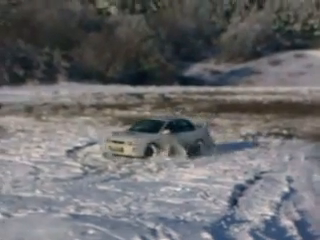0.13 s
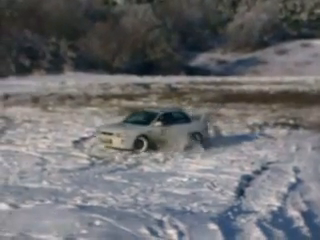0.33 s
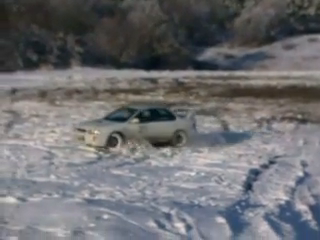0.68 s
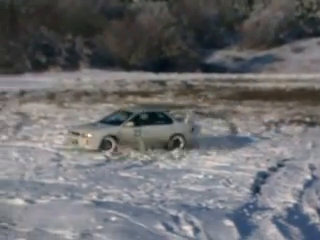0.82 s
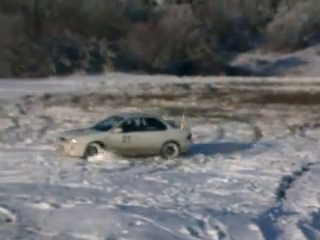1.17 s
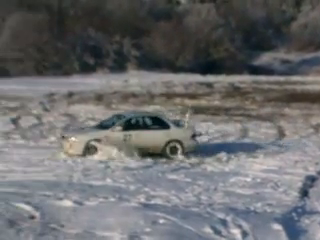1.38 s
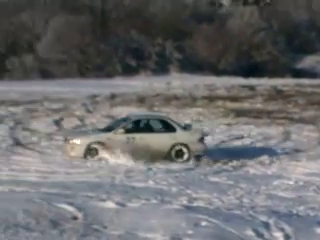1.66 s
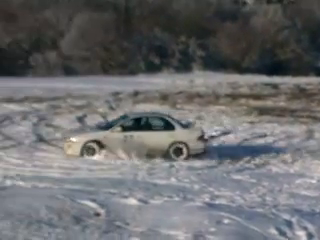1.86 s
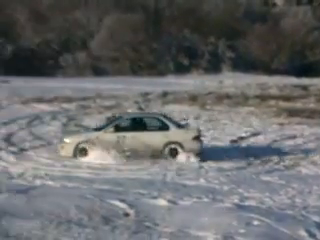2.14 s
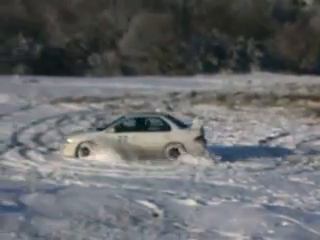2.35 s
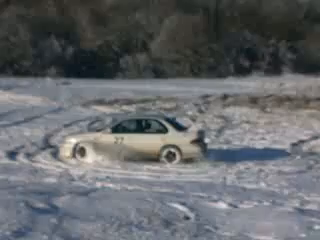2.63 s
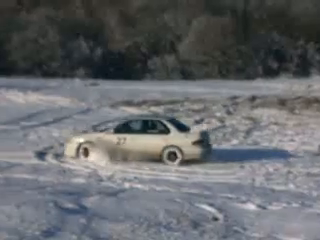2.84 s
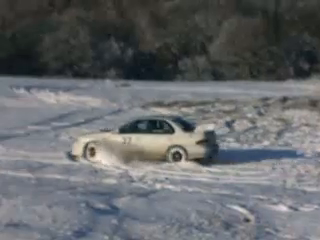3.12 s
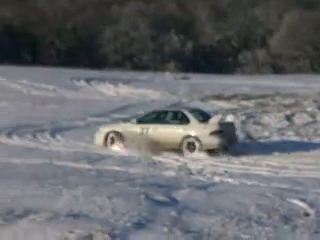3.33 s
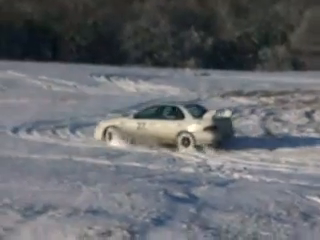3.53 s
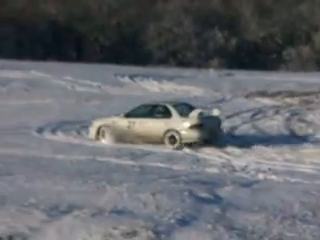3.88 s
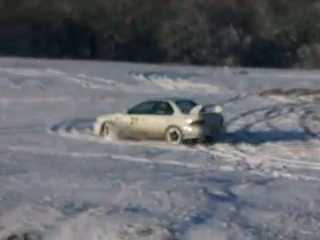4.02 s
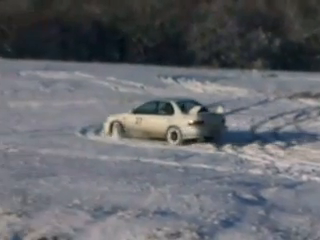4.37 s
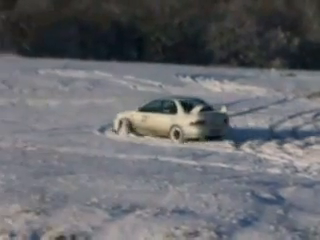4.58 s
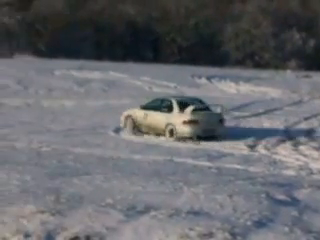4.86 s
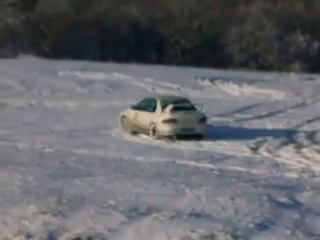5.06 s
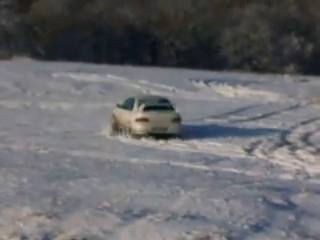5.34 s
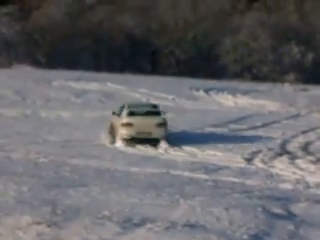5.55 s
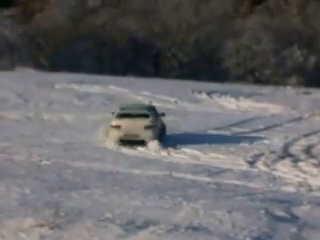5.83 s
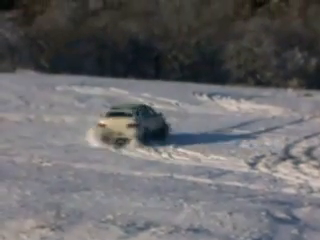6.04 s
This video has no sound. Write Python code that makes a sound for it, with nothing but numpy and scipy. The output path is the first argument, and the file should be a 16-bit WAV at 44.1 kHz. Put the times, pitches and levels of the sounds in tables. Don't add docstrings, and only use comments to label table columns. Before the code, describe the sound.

A turbocharged car engine burbles and revs while sliding on snow outdoors, with tyre spray, tailpipe pops and faint camera hiss.

```python
import sys
import numpy as np
from scipy import signal
from scipy.fft import rfft, irfft, next_fast_len
from scipy.io import wavfile
from scipy.ndimage import uniform_filter1d, minimum_filter1d, map_coordinates

SR = 44100
rng = np.random.default_rng(int(sys.argv[2]) if len(sys.argv) > 2 else 0)


def boost(x):
    u = np.asarray(x, float) / 20
    return 10 ** u


def wav_record(signal):
    frames = np.transpose(np.atleast_2d(signal))
    bounded = np.clip(frames, -1, 1)
    quanta = np.round(bounded * 32767).astype(np.int16)
    wavfile.write(sys.argv[1], SR, quanta)


N = 273375
T = np.arange(N) / SR

# time_s, firing_rate_hz
ENGINE_SPEED = [(0.0, 90.87), (0.29, 116.59), (0.528, 106.78), (0.835, 77.92), (1.07, 65.43),
                (1.503, 59.84), (2.007, 75.63), (2.584, 52.15), (3.017, 69.04), (3.646, 53.86),
                (3.811, 53.94), (4.384, 37.93), (4.42, 45.85), (4.69, 51.47), (5.145, 72.08),
                (5.226, 72.27), (5.819, 95.43), (6.2, 98.95)]
# time_s, exhaust_pressure_db, pulse_sharpness_db
ENGINE_LOAD = [(0, -38, 6), (.2, -40, 11.5), (.4, -42.5, 12), (.72, -31.5, -11), (1.0, -43.5, -3),
               (1.45, -39, 0), (1.7, -38.5, -2), (2.0, -35.5, -0.5), (2.5, -42.5, -11.5), (2.7, -42, -1.5),
               (3.0, -35.5, -5), (3.2, -38.5, -4), (3.9, -41.5, -5), (4.2, -53, 1.5), (4.5, -47.5, -1),
               (5.1, -37, -8), (5.85, -39, -1.5), (6.2, -41.5, -0.5)]
# open_s, shut_s, wheelspin_spray_db, spray_crack_share (0-1, spray band cracking with each firing)
THROTTLE_BLIPS = [
    (-.3, .32, 3, 0),
    (1.54, 1.86, 1.5, 0.02),
    (2.604, 2.978, 3, 0.58),
    (4.418, 4.982, 7.5, 0.6),
    (4.912, 6.003, 5, .3),
]
# time_s, share (0-1)
NOSE_FACING = [(0, 1), (.55, 1), (.95, 0), (6.2, 0)]
# time_s, share (0-1)
TAIL_FACING = [(0, 0), (4.55, 0), (5.45, 1), (6.2, 1)]
# freq_hz, level_db
SILENCER = [(80, 13.5), (100, 9), (120, 5.5), (140, 1), (155, -12.5), (175, -17.5), (200, -20),
            (240, -15.5), (300, -23.5), (400, -32), (600, -80)]
# freq_hz, level_db
BANK_BURBLE = [(35, -55), (55, -20), (75, -8.5), (95, 2.5), (115, 3.5), (135, 3.5), (150, -1.5),
               (170, -9.5), (200, -21), (240, -21), (300, -37), (400, -33.5), (600, -78)]
# freq_hz, level_db
FRONT_COLOUR = [(60, -24), (85, -10), (115, -14.5), (150, 14), (200, 7.5), (240, -2), (300, -7), (900, 12)]
# pitch_hz, width_hz, level_db
OUTLET_MODES = [(314, 78, 0), (610, 88, 4.5), (1210, 130, -7.5), (1750, 81, -10.5)]
# freq_hz, level_db
RASP_COLOUR = [(200, 12), (330, 6.5), (420, -12), (520, 7), (650, 8.5), (800, 7.5), (1000, -14.5),
               (1300, -4.5), (1600, -32)]
# freq_hz, level_db
SPRAY_COLOUR = [(700, 5.5), (1200, -1), (1600, 1.5), (1950, 2), (2150, -2), (2380, 1.5), (2550, -9),
                (2780, -2), (3000, -19), (3300, -9.5), (3600, -21), (3750, -24), (7000, -19.5)]
# start_s, peak_db, ring_hz, thud_db, knock_db
TAILPIPE_POPS = [(0.016, -29, 985, -2, -21), (0.527, -26, 1090, -6, -16.5),
                 (3.763, -12, 1105, -10.5, -15.5), (4.165, -15.5, 943, -21, -13),
                 (4.922, -18.5, 856, -17, -14.5), (5.089, -22, 910, -7, -12),
                 (5.198, -19.5, 850, -12, -12.5), (5.326, -23.5, 840, -15, -8), (5.386, -26, 810, -10, -17),
                 (5.547, -28, 790, -16, -18), (5.654, -22, 830, -6.5, -8)]
# pitch_hz, width_hz, level_db
TAILPIPE_MODES = [(290, 112, 9), (614, 266, 10.5), (1838, 185, -13.5), (2106, 460, -13), (3090, 200, -30),
                  (4200, 100, -28)]
# centre_s, length_s, level_db, centre_hz, width_hz
CRUST_BREAKS = [(0.24, 0.12, -56, 960, 1630), (0.471, 0.091, -58, 830, 900),
                (0.543, 0.068, -47, 50.4, 27.2), (0.904, 0.039, -56, 1410, 2570),
                (1.137, 0.02, -56.5, 1860, 2400), (1.265, 0.0068, -51.5, 1710, 1600),
                (1.511, 0.048, -53, 905, 1420), (2.686, 0.013, -63, 910, 1300),
                (2.88, 0.11, -63.5, 1200, 910), (4.208, 0.014, -61.5, 795, 530),
                (4.289, 0.039, -53.5, 604, 610), (4.286, 0.032, -47.5, 240, 104)]
# firing_rate_multiple, casing_hz, width_hz, level_db
GEAR_WHINE = [(35.4, 2370, 160, -65), (29.4, 1590, 80, -66), (23.5, 1610, 100, -73), (10.3, 1120, 90, -62)]
# centre_hz, width_hz, level_db, loudest_s
BAY_AIR = [(2400, 200, -69, .3), (2760, 240, -65, .8), (3300, 220, -72, .55), (1940, 30, -75, 3.55)]
# freq_hz, level_db
HISS_COLOUR = [(20, 13), (60, 30.5), (150, 22), (400, 0.5), (1500, 1.5), (4000, -3.5), (8000, -4.5),
               (11000, -3), (14200, 0)]
# multiple of 292.9 Hz, level_db
MOTOR_TONES = [(35, -93), (36, -90), (37, -92), (38, -92), (43, -91), (45, -90)]

FIRST_FIRING, BANK_LAG, OVERTONE_LAG, CRACK_LAG = -.032, .5, .2, .39
FLYWHEEL_S = .06
SILENCER_S = .009
STAB_S, LIFT_S = 0.028, 0.17
OPEN_DB, OPEN_SHARP_DB = 5.5, 4.5
FULL_DB = -34
BANK_DB, BANK_PRESSURE, BANK_SHARP, BANK_OPEN_DB = -44.5, 0.63, 0.38, -2
BANK_LUG_DB, BANK_LUG_LEAD = 0.3042, 0.0249
RASP_DB, RASP_PRESSURE, RASP_SHARP, RASP_TAIL_DB = -59, 0.59, 0.29, 7.5
RASP_OPEN_DB, RASP_DB_PER_HZ = 1, 0.0734
BARK_IDLE, BARK_OPEN, BARK_TAIL = .06, .28, .52
SPRAY_DB, SPRAY_DB_PER_S = -58.5, -2.44
SNAP_DB, SNAP_S = -23, .009
HISS_DB, GAIN_RIDE = -67.5, 1
GAIN_S, GAIN_START_DB = 0.94, -31
TOP_HZ, EDGE_HZ = 14300, 15050


def unit(x):
    return x / np.sqrt(np.mean(x ** 2) + 1e-20)


def curves(rows):
    s, *cols = np.transpose(rows)
    return [np.interp(T, s, c) for c in cols]


def gain(points, hz):
    f, db = np.transpose([(1, -120), *points, (SR / 2, -120)])
    return boost(np.interp(np.log(hz + 1), np.log(f), db))


def filtered(x, response):
    m = 2 * next_fast_len(N // 2 + 8192)
    return irfft(rfft(x, m) * response(np.fft.rfftfreq(m, 1 / SR)), m)[:N]


def mode(f, hz, width):
    return 1j * f * width / (hz * hz - f * f + 1j * f * width)


def wobble(rate):
    return map_coordinates(rng.standard_normal(int(N * rate / SR) + 4), [T * rate])


def noise(points):
    return unit(filtered(rng.standard_normal(N), lambda hz: gain(points, hz)))


def pulses(firing, pattern, scatter_db, jitter=0):
    k = np.arange(np.ceil(firing[0]), firing[-1])
    at = np.interp(k + jitter * rng.standard_normal(len(k)), firing, np.arange(N)).astype(int)
    size = np.array(pattern)[k.astype(int) % 4] * boost(scatter_db * rng.standard_normal(len(k)))
    return np.bincount(at, size, N)


def puffs(kicks, decay_s):
    return unit(signal.lfilter([1], [1, -np.exp(-1 / (decay_s * SR))], kicks))


def throttle():
    down = []
    for opens, shuts, _, _ in THROTTLE_BLIPS:
        travel = np.minimum((T - opens) / STAB_S, (shuts - T) / LIFT_S)
        down.append(np.clip(travel + .5, 0, 1))
    down = np.array(down)
    down = down / np.maximum(down.sum(axis=0), 1)
    spin_db, crack = np.array(THROTTLE_BLIPS)[:, 2:].T @ down
    return down.sum(axis=0), spin_db, crack


def pressure():
    (pressure_db, sharp_db), pedal = curves(ENGINE_LOAD), throttle()[0]
    return pressure_db + OPEN_DB * pedal, sharp_db + OPEN_SHARP_DB * pedal


def exhaust(rate, firing):
    tone_db, sharp_db = pressure()
    pedal = throttle()[0]
    tone = np.sqrt(2) * boost(tone_db + 0.44 * wobble(25)) * np.cos(2 * np.pi * firing)

    late = firing - OVERTONE_LAG
    train = SR / rate * pulses(late, [1, 1, 1, 1], scatter_db=0.75, jitter=0.012)
    train = train - 2 * np.cos(2 * np.pi * late)
    overtones = boost(tone_db + sharp_db - 8.0) * train
    overtones = filtered(overtones, lambda hz: gain([(50, -30), *SILENCER, (900, -60)], hz))

    lug = pedal * np.clip(65 - rate, 0, None)
    bank_db = BANK_DB + BANK_PRESSURE * (tone_db - FULL_DB) + BANK_SHARP * sharp_db
    bank_db = bank_db + BANK_OPEN_DB * pedal + BANK_LUG_DB * lug
    bank_count = np.maximum.accumulate(firing - BANK_LAG + BANK_LUG_LEAD * lug)
    banks = SR / rate * pulses(bank_count, [1, 1, -1, -1], scatter_db=2.4)
    burble = filtered(boost(bank_db) * banks, lambda hz: gain([*BANK_BURBLE, (900, -60)], hz))

    upper = overtones + burble
    nose = curves(NOSE_FACING)[0]
    return tone + (1 - nose) * upper + nose * filtered(upper, lambda hz: gain(FRONT_COLOUR, hz))


def outlet(f, heat):
    total = 0
    for k, (hz, width, db) in enumerate(OUTLET_MODES):
        total = total + (-1) ** k * boost(db) * mode(f, heat * hz, width)
    return total


def rasp_and_spray(rate, firing):
    pressure_db, sharp_db = pressure()
    tail = curves(TAIL_FACING)[0]
    pedal, spin_db, crack = throttle()
    kicks = pulses(firing + rate * SILENCER_S - CRACK_LAG, [.6, .5, 1, .8], scatter_db=2, jitter=.016)

    hot = np.clip((rate - 78) / 20, 0, 1)
    cool, warm = (filtered(kicks * np.sqrt(70 / rate), lambda f: outlet(f, heat)) for heat in (.88, 1.08))
    bark = unit(np.sqrt(1 - hot) * cool + np.sqrt(hot) * warm)
    gas = boost(1.9 * wobble(28)) * (1.49 + 0.88 * puffs(kicks, decay_s=0.0065)) * noise(RASP_COLOUR)

    rasp_db = RASP_DB + RASP_PRESSURE * (pressure_db - FULL_DB) + RASP_SHARP * sharp_db
    rasp_db = rasp_db + RASP_TAIL_DB * tail + RASP_OPEN_DB * pedal + RASP_DB_PER_HZ * (rate - 70)
    clean = np.clip(BARK_IDLE + BARK_OPEN * pedal + BARK_TAIL * tail, 0, 1)
    rasp = boost(rasp_db - 9.5) * (np.sqrt(clean) * bark + np.sqrt(1 - clean) * gas)

    crack = np.clip(crack, 0, 1)
    cracks = puffs(kicks * boost(2.7 * wobble(30)), decay_s=0.0021)
    gate = np.sqrt(1 - crack) + np.sqrt(crack) * cracks
    spray_db = SPRAY_DB + SPRAY_DB_PER_S * T + spin_db + 1.4 * wobble(19)
    return rasp + boost(spray_db) * gate * noise(SPRAY_COLOUR)


def bay():
    out = np.zeros(N)
    for hz, width, db, loudest_s in BAY_AIR:
        band = unit(filtered(rng.standard_normal(N), lambda f: mode(f, hz, width) ** 2))
        out += boost(db - 12.1 * abs(T - loudest_s) + 1.7 * wobble(4.53)) * band
    return out


def pops():
    out, t = np.zeros(N + 4096), np.arange(4096) / SR
    f = np.fft.rfftfreq(len(t), 1 / SR)
    for s, db, hz, thud_db, knock_db in TAILPIPE_POPS:
        ring = mode(f, hz, 430) ** 2
        for k, (centre, width, level) in enumerate(TAILPIPE_MODES):
            level = level + rng.normal(0, 1) + [thud_db, knock_db, 0][min(k, 2)]
            ring = ring - (-1) ** k * boost(level) * mode(f, centre, width) ** 2
        ring = ring * (1 + rng.uniform(.15, .3) * np.exp(-2j * np.pi * f * 2 / hz))
        echo = boost(-20.0) * np.exp(-2j * np.pi * f * 0.0098) / (1 + 1j * f / 1500)
        blast = irfft(ring * (1 + echo), len(t))
        burst = boost(-60 * t / SNAP_S) * rng.standard_normal(len(t))
        snap = irfft(rfft(burst) * mode(f, 7500, 5200), len(t))
        pop = blast / abs(blast).max() + boost(SNAP_DB) * snap
        out[round((s + .0004) * SR):][:len(t)] += boost(db - 5.5) * pop
    return out[:N]


def crunch():
    out = np.zeros(N)
    t = np.arange(-.2 * SR, .2 * SR) / SR
    f = np.fft.rfftfreq(len(t), 1 / SR)
    for s, length, db, hz, width in CRUST_BREAKS:
        grains = rng.standard_normal(len(t))
        grain_db = 4 * rng.standard_normal(len(t) // 90 + 1).repeat(90)[:len(t)]
        colour = mode(f, hz, width) ** 2 / (1 + (f / 3000) ** 8)
        swell = irfft(rfft(grains * boost(grain_db)) * colour, len(t)) * np.exp(-.5 * (t / length) ** 2)
        out[round((s - .2) * SR):][:len(t)] += boost(db) * np.sqrt(4.4 * length) * unit(swell)
    return out


def gears(rate, firing):
    away_db = -9 * np.clip(T - 2.3, 0, None) - 9 * np.clip(2.15 - T, 0, 1.2)
    out = np.zeros(N)
    for k, hz, width, db in GEAR_WHINE:
        casing = abs(mode(k * rate, hz, width)) ** 2
        out += boost(db + away_db) * casing * np.sin(2 * np.pi * k * firing)
    return out


def scene():
    rate = uniform_filter1d(curves(ENGINE_SPEED)[0], size=round(FLYWHEEL_S * SR), mode="nearest")
    firing = FIRST_FIRING + np.cumsum(rate) / SR
    smooth = uniform_filter1d(rate, size=SR // 8)
    engine = exhaust(rate, firing) + rasp_and_spray(smooth, firing)
    mesh = gears(smooth, np.cumsum(smooth) / SR)
    return (engine + bay() + pops() + crunch() + mesh)[None]


def riding_db(x):
    keep = np.exp(-1 / (GAIN_S * SR))
    power = signal.lfilter([1 - keep], [1, -keep], x ** 2, zi=[boost(GAIN_START_DB) ** 2])[0]
    return -GAIN_RIDE * (10 * np.log10(power) - FULL_DB)


def thinned_treble(x, share=.09):
    hz, _, z = signal.stft(x, SR, nperseg=2048)
    power = uniform_filter1d(abs(z) ** 2, size=7, axis=0)
    treble = ((hz > 3500) & (hz < TOP_HZ))[:, None]
    weak = treble & (power < np.quantile(power[treble[:, 0]], share))
    gone = ~minimum_filter1d(~weak, size=5, axis=0)
    return signal.istft(z * np.where(gone, .05, 1), SR, nperseg=2048)[1][:N]


def roll_off(x):
    return signal.sosfilt(signal.butter(12, 15310, fs=SR, output="sos"), x)


def record(dry):
    hiss = filtered(rng.standard_normal(N), lambda hz: gain(HISS_COLOUR, hz) * (hz < TOP_HZ))
    hiss_db = HISS_DB + riding_db(dry[0]) + 6.5 + 0.21 * wobble(15)
    motor = np.zeros(N)
    for k, db in MOTOR_TONES:
        motor += boost(db + 2 * wobble(6)) * np.sin(2 * np.pi * 292.9 * k * T + .6 * wobble(30))
    heard = filtered(dry[0], lambda hz: hz < EDGE_HZ) + boost(hiss_db) * hiss + motor
    heard = heard / (1 + abs(heard / .11) ** 6) ** (1 / 6)
    return roll_off(thinned_treble(heard)[None])


dry = scene()
out = record(dry)
wav_record(out)
```